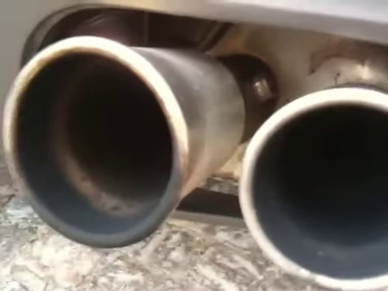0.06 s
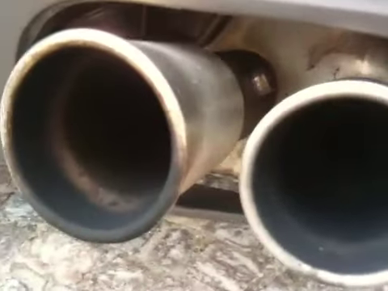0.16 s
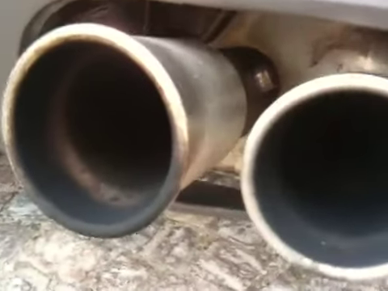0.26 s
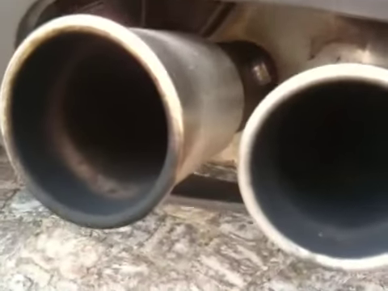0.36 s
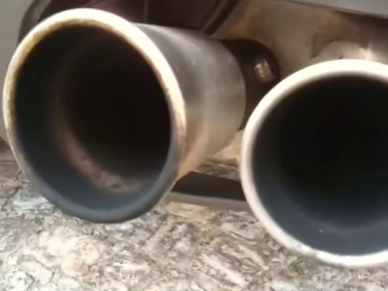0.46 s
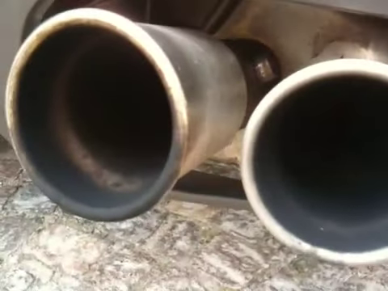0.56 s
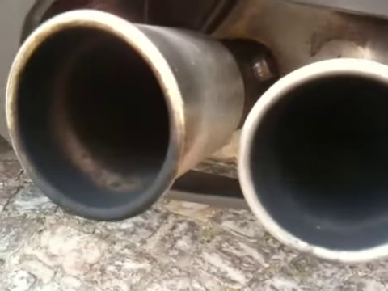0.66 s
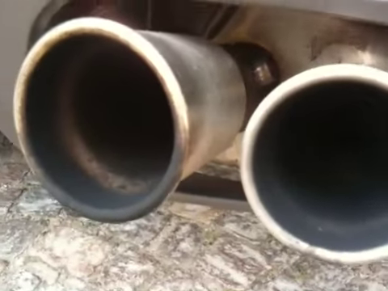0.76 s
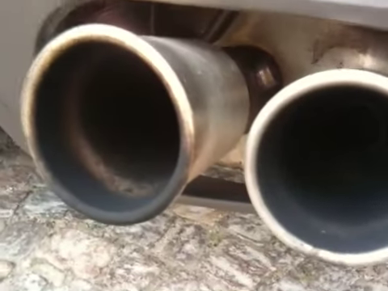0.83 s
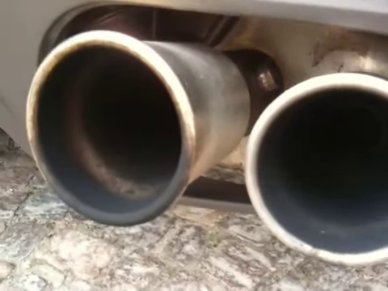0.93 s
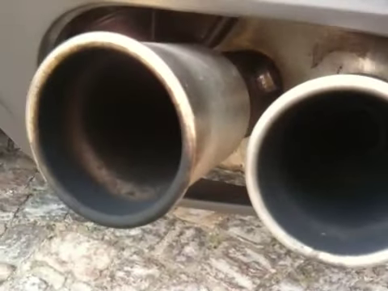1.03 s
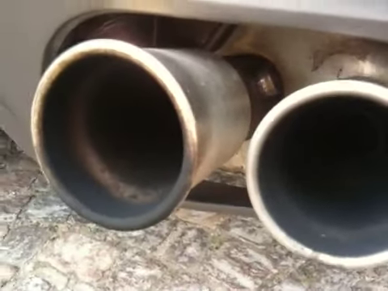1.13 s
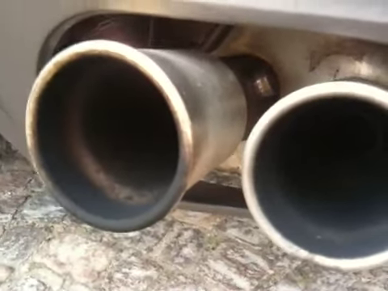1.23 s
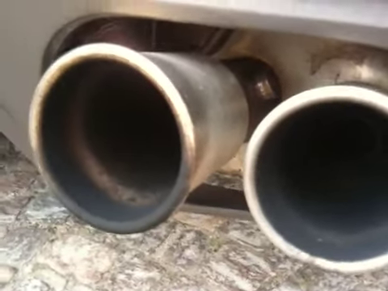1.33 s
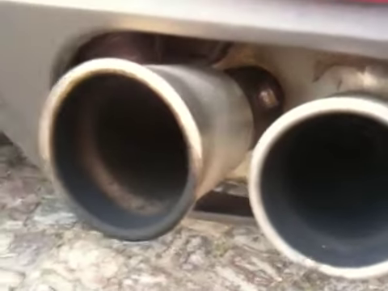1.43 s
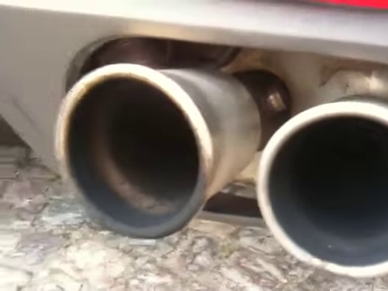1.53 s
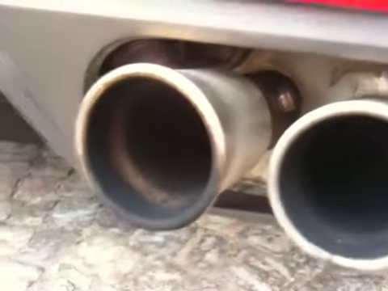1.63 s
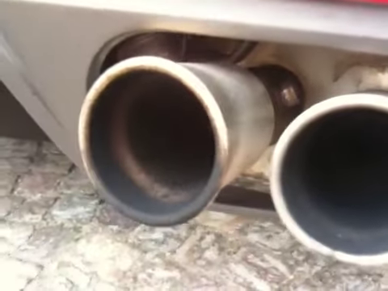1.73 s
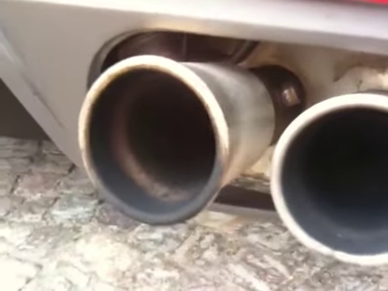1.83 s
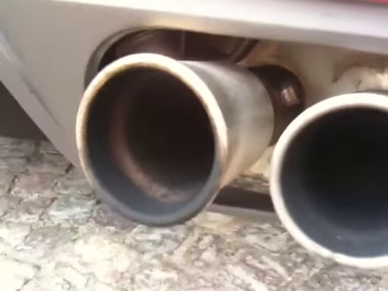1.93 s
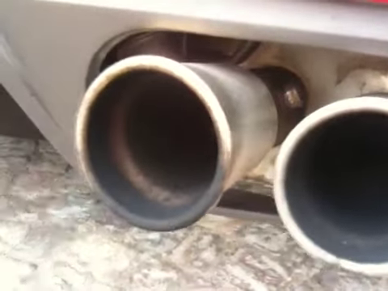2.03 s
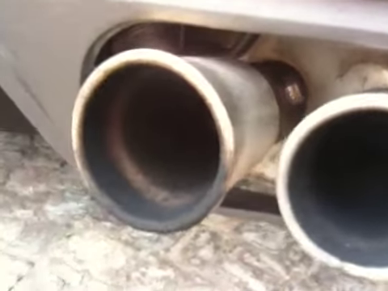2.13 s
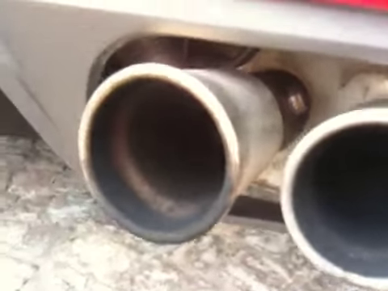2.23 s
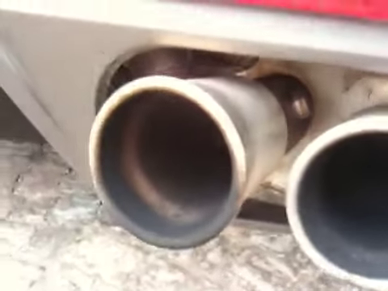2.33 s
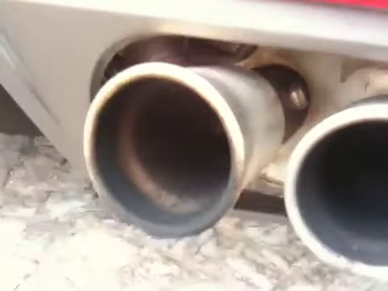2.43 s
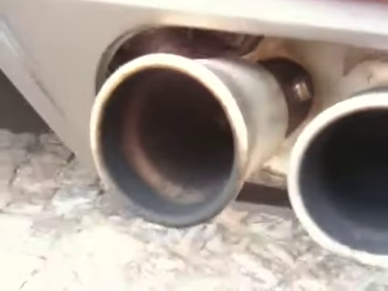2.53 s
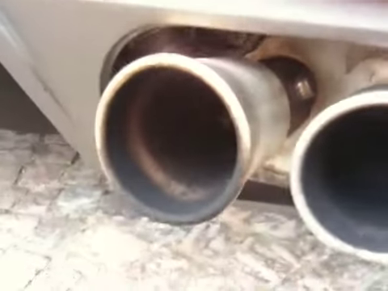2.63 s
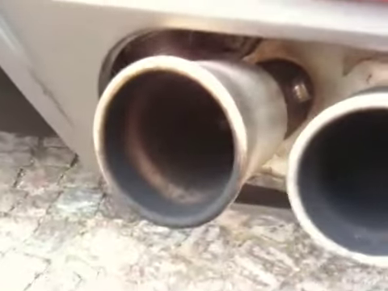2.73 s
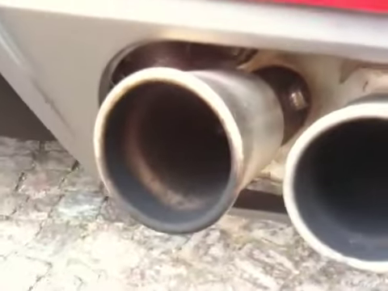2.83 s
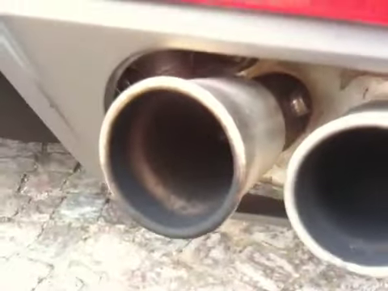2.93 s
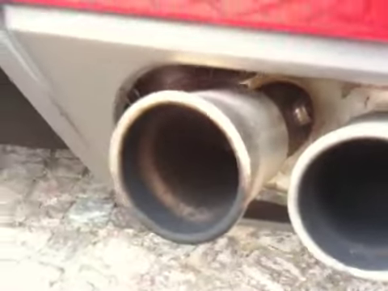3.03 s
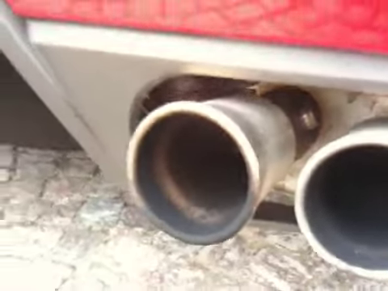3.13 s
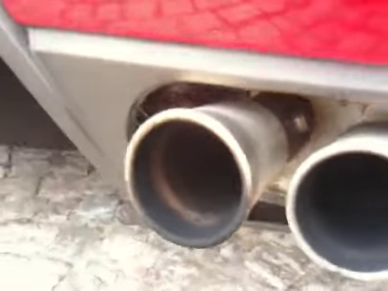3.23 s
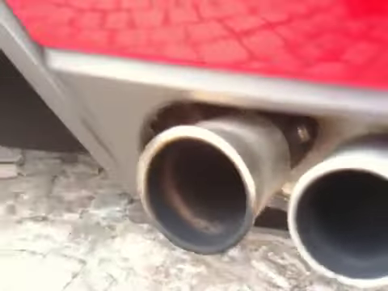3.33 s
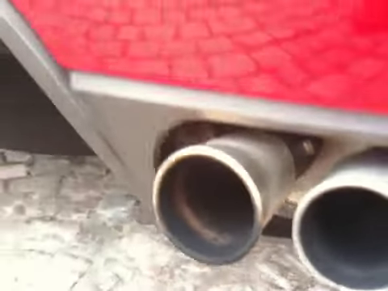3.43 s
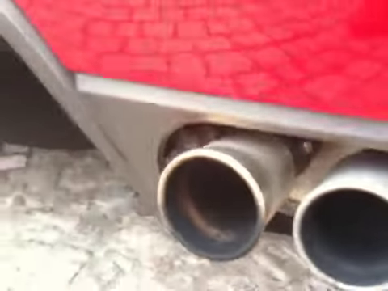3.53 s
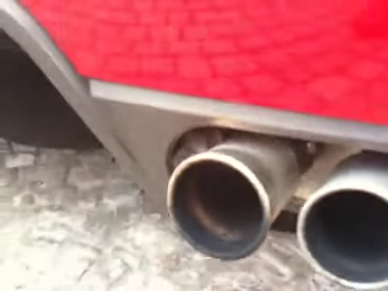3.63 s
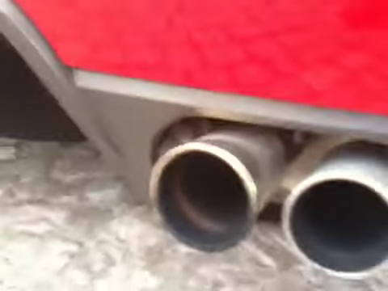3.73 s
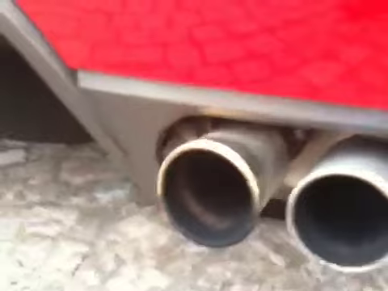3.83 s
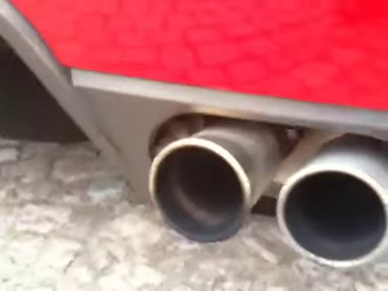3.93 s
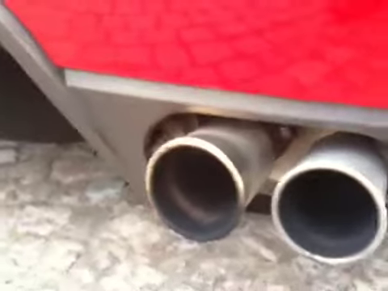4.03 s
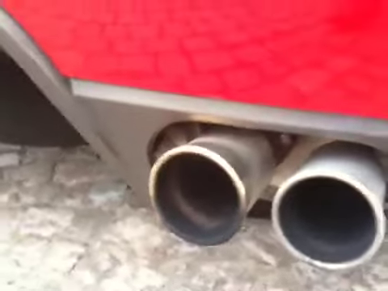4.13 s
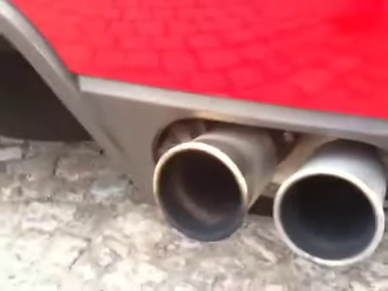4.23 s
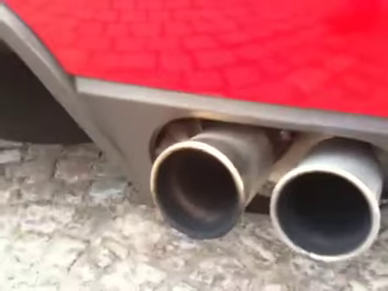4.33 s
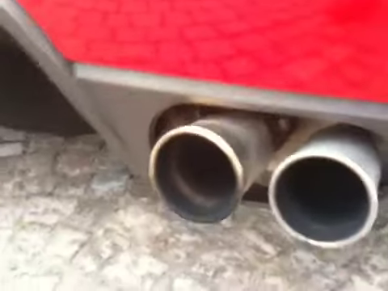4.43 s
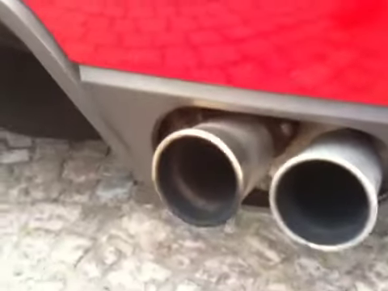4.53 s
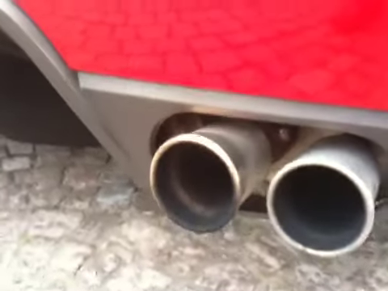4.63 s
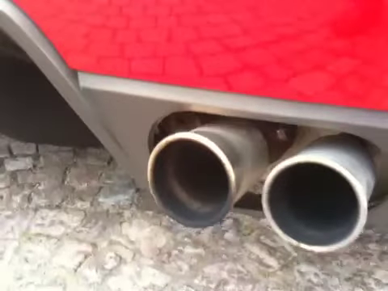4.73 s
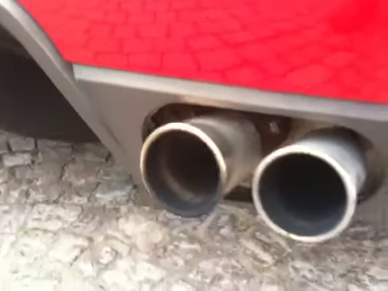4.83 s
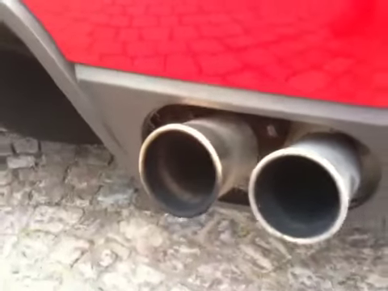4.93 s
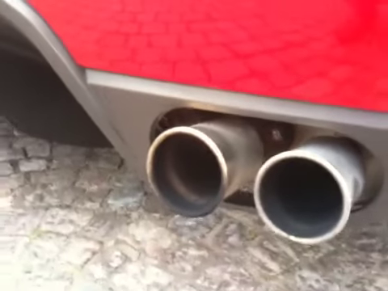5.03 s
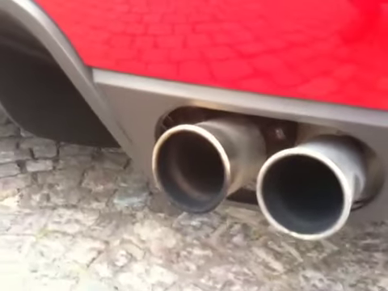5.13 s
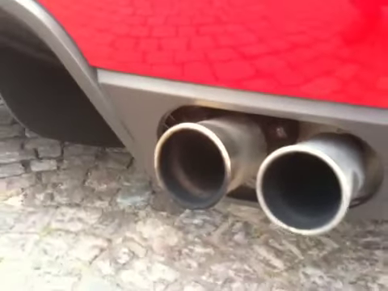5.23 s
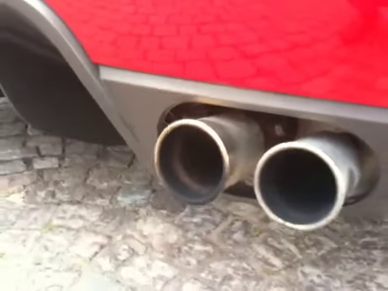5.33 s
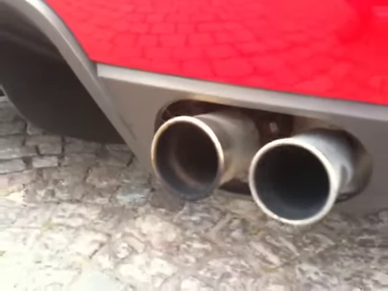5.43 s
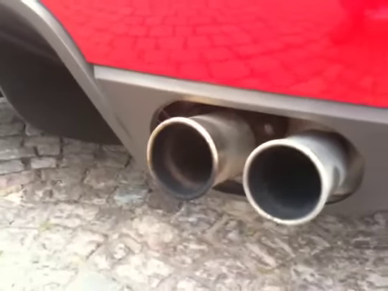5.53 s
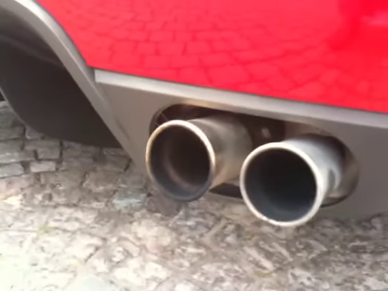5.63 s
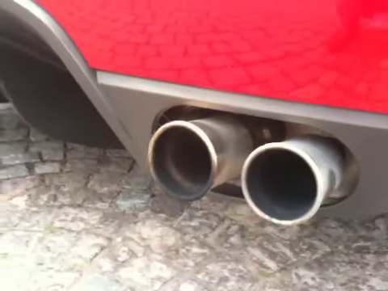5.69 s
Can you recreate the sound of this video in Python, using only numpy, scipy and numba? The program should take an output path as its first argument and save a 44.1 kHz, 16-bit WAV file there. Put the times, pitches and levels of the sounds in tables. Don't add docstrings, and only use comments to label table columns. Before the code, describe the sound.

A starter motor grinds and whines, then a big car engine barks alive, falters, roars up harshly close to the tailpipes and drops off.

```python
import sys
import numpy as np
from scipy import signal
from scipy.io import wavfile
from scipy.ndimage import uniform_filter1d
from numba import njit

SR = 44100
rng = np.random.default_rng(int(sys.argv[2]) if len(sys.argv) > 2 else 0)


def pcm_store(signal):
    levels = np.round(np.clip(np.atleast_2d(signal), -1, 1) * 32767)
    wavfile.write(sys.argv[1], SR, levels.astype(np.int16).T)


def voltage_ratio(decibels):
    exponent = np.asarray(decibels, float) / 20
    return 10 ** exponent


N = 254016

# pitch_hz [Hz], level_db [dB per Hz]
STREET_COLOUR = [(18, -76), (30, -46), (85, -17), (102, -15), (180, -7), (228, -3.5), (296, -9), (581, -10),
                 (735, -8.5), (815, -8), (1780, -16.5), (6200, -57), (15000, -47)]
# start_s [s], level_db [dB]
RUSTLES = [
    (.01, -74),
    (.184, -78),
    (.566, -58),
    (.658, -79),
]
STREET_DB, STREET_FADE_DB_S, STREET_FADE_S, STREET_FLICKER_DB = -46.5, 7, .85, 1.4
RUSTLE_DB, RUSTLE_DECAY_S = -71, 0.028

# time_s [s], mesh_hz [Hz], level_db [dB]
WHINE = [
    (1.19, 684, -52),
    (1.27, 789, -51),
    (1.325, 954, -42),
    (1.375, 832, -49.5),
    (1.42, 930, -41.5),
    (1.47, 937, -58),
    (1.51, 995, -43.5),
    (2.02, 949, -42.5),
    (2.06, 900, -53),
]
# multiple [of mesh_hz], level_db [dB]
WHINE_ORDERS = [(1, 1.5), (2, 4.5), (3, -1), (4, -5)]
# pitch_hz [Hz], level_db [dB per Hz]
GRIND_COLOUR = [(59, -34), (100, -5), (242, -16), (367, -11.5), (609, -3), (855, 1.5), (1250, -12.5),
                (1920, 9.5), (2500, -17), (2910, 0.5), (9000, -21), (11700, -45), (19800, -120)]
# pitch_hz [Hz], width_hz [Hz], level_db [dB]
HOUSING = [(232, 36, 1), (1110, 18, 6), (2980, 77, -18), (3100, 73, -5), (3860, 150, -6)]
# peak_s [s], pitch_hz [Hz], length_s [s], level_db [dB]
PINION_CHIRP = (1.18, 1140, .025, -34)
# start_s [s], peak_db [dB], pitch_hz [Hz]
PUFFS = [
    (0.948, -42, 114),
    (1.066, -39, 86.1),
    (1.275, -34, 105),
    (1.434, -40, 88.8),
    (1.575, -35, 101),
    (1.721, -37, 72),
    (1.868, -35, 106.3),
    (2.019, -41, 123.7),
]
ENGAGE_S, SLAM_RISE_S, SLAM_HOLD_S, STARTER_OFF_S = 0.899, 0.012, 0.037, 2.12
SLAM_DB, SLAM_SCRAPE_DB, SLAM_FALL_DB_S, SCRAPE_FALL_DB_S = -32, -40, 148, 320
GRIND_DB, SCRAPE_SLOW_DB, SCRAPE_FAST_DB = -37.5, -71, -55
SPIN_UP_S, LET_GO_S, LET_GO_DB = (1.14, 1.46), (1.976, 2.3), -19
BOUNCE_S, BOUNCE_WIDTH_S, BOUNCE_DB = .936, .007, 5.5

# start_s [s], ring_db, crack_db, thud_db [peak dB]
POPS = [(2.1, -32, -52, -18), (2.135, -34, -39, -9.5), (2.163, -13, -41, -6), (2.188, -29, -38, -3),
        (2.204, -13, -33, -7), (2.222, -3, -31.5, -27), (2.237, -8, -33, -1), (2.251, -5, -34, -21),
        (2.266, -8, -32, -6), (2.931, -15, -44, -29), (3.018, -12, -49, -28), (3.059, -2, -37, -9),
        (3.097, 0, -50, -3.5), (3.127, -24, -55, -6), (3.154, -8, -53, -13), (3.223, -2.5, -38, -3.5),
        (3.257, -1.5, -36, -46), (3.351, -6, -41, -6.5), (3.398, -14, -50, -10), (5.487, -1, -52, -10),
        (5.513, 3, -35.5, -14), (5.546, -2, -40, -22), (5.585, -10, -40, -28), (5.595, -0.5, -43, -22),
        (5.7, -8, -38, -20)]
# pitch_hz [Hz], width_hz [Hz], level_db [dB]
PIPE = [(78, 76, -8), (127, 58, -4), (263, 67.7, -3.5), (334, 89, -6), (476.4, 80, 1), (538.6, 52.8, 2),
        (650.6, 134, -5), (734, 121, -5), (930, 530, -15.5), (1121, 77, -10.5), (1500, 800, -28)]
CYLINDER_DB = [0.5, 4.5, -0.5, 8.5, -3.5, 8.5]
# [firings a second in one bank, Hz]
SPEED = [(2.17, 51.96), (2.31, 107.4), (2.39, 127.8), (2.52, 131.6), (2.7, 123.5), (2.87, 104.8),
         (3.09, 70.99), (3.27, 57.88), (3.4, 77.5), (3.52, 122.8), (3.7, 280.2), (3.78, 322), (3.87, 334),
         (4.2, 305.9), (4.42, 280.2), (4.51, 265.6), (4.62, 252), (5.76, 80.35)]
# [unevenness, dB]
LOAD = [(2.1, -23, -66, 2.5), (2.2, -9, -31, 5.5), (2.3, -4.5, -23, 2), (2.5, -3.5, -20, 1),
        (2.72, -4.5, -25, 3.5), (2.87, -4.5, -26.5, 2), (2.92, -9.5, -36, 3.5), (3.15, -16, -31.5, 2.5),
        (3.3, -15, -41, 2.5), (3.48, -5, -23, 3), (3.66, -2.5, -15, 2), (3.77, 1, -8, -0.5),
        (3.95, 0, -16.5, -1.5), (4.42, -5, -18.5, 2.5), (4.51, -23, -16.5, -5), (4.62, -5, -20, 5.5),
        (5.36, -3, -28.5, 3), (5.5, -12.5, -35.5, 4.5)]
# pitch_hz [Hz], level_db [dB per Hz]
GAS = [(410, -56), (700, -29.5), (919, -11.5), (1130, 4.5), (1220, -13.5), (1490, -12), (3880, -15),
       (12800, -34), (15600, -38)]
ORDERS = [6, 12, 18, 24, 36, 42, 3, 9, 15, 21, 27, 39, 4, 5, 7, 8, 10, 11, 13, 14, 16, 19, 33, 45]
ORDER_DB = [-3.5, 1.5, -2.5, -5, -8, -7, -1.5, 1.5, -1.5, -2.5, -10, -4.5, -13.5, -3, -12, -5.5, -24.5, -8,
            -3, -13.5, -4.5, -7.5, -5.5, -15.5]
# [strong-weak alternation, dB]
FIRING = [(2.15, -18.5, -29), (2.35, 0, -7.5), (2.55, 0, -8), (2.75, 2.5, -6), (2.9, -5.5, -16.5),
          (3.3, -15.5, -22), (3.5, 1, -6.5), (3.7, -5, -3.5), (3.82, -2.5, -25.5), (3.87, 1, -8.5),
          (4.05, -12.5, -5), (4.4, -6, -2.5), (4.5, -0.5, -13.5), (4.6, -6, -5), (4.85, -4, -2.5),
          (5.2, 1, -4), (5.42, -1.5, -12), (5.55, -5, -15.5)]
# pitch_hz [Hz], width_hz [Hz], level_db [dB]
EVEN_WAVES = [(128, 81, -11.5), (263.7, 74, -13.5), (326, 40.4, -7.5), (543.6, 101, -2), (387, 50, -20),
              (776, 355, -10.5)]
# pitch_hz [Hz], width_hz [Hz], level_db [dB]
BEAT_WAVES = [(163, 14, -9.5), (110, 30, -22.5), (254, 85, -19.5), (197, 50, -16.5), (462.6, 63, -0.5),
              (373, 93, -10.5), (593, 122, -4), (720, 83.3, -9), (876, 77, -20)]
# pitch_hz [Hz], width_hz [Hz], level_db [dB]
SHRIEK = [(1150, 157, 1.5), (1456, 93, -3)]
LUMP_SHARE, LUMP_PER_100_HZ = 0.67, 0.15
RUMBLE_DB, RUMBLE_PER_FLOW = -15.5, 0.45
RUMBLE_PER_PULSE, RUMBLE_PER_100_HZ = 0.28, -2.5
SHRIEK_PER_FLOW, FULL_FLOW_DB, SHRIEK_FLOOR_DB = 4.1, -10.5, -17
WAVER, WAVER_PER_SCATTER_DB = .012, .008
DULL_PER_FLOW = 0.36
MINOR_PER_SCATTER, MINOR_TILT_DB = -1.48, -4.5
FLUTTER_DB, FLUTTER_PER_SCATTER = 1.2, .25
OPEN_PIPE_DB = -26


@njit
def svf(x, hz, width):
    y, band, low = np.empty(len(x)), 0., 0.
    g, k = np.tan(np.pi * hz / SR), width / hz
    for i in range(len(x)):
        v = (band + g * (x[i] - low)) / (1 + g * (g + k))
        band, low, y[i] = 2 * v - band, low + 2 * g * v, k * v
    return y


def level(x, db=0):
    return x * voltage_ratio(db) / np.sqrt(np.mean(x ** 2))


def butter(x, order, hz, kind="low"):
    return signal.sosfilt(signal.butter(order, hz, kind, fs=SR, output="sos"), x)


def curves(table):
    times, *columns = np.transpose(table)
    t = np.arange(N) / SR
    return t, (t > times[0]) * 1., [np.interp(t, times, column) for column in columns]


def walk(rate):
    hold = int(SR / rate)
    steps = np.repeat(rng.standard_normal(N // hold + 1), hold)
    return 1.43 * uniform_filter1d(uniform_filter1d(steps, hold), hold)[:N]


def coloured(colour, flicker_db, rate):
    hz, db = np.transpose(colour)
    out = 0
    for centre in hz[0] * 2 ** np.arange(.25, np.log2(hz[-1] / hz[0]), .5):
        band = svf(svf(rng.standard_normal(N), centre, centre / 2), centre, centre / 2)
        band_db = np.interp(np.log(centre), np.log(hz), db)
        out = out + voltage_ratio(band_db + flicker_db * walk(rate)) * band
    return level(out)


def ring(x, modes):
    return sum((-1) ** k * voltage_ratio(db) * svf(x, 1. * hz, 1. * width) for k, (hz, width, db) in enumerate(modes))


def street():
    t = np.arange(N) / SR
    wash_db = STREET_DB - STREET_FADE_DB_S * np.minimum(t, STREET_FADE_S)
    wash = coloured(STREET_COLOUR, STREET_FLICKER_DB, 26.4) * voltage_ratio(wash_db)
    age = np.clip(t - .114, 0, 1)
    stone = voltage_ratio(-33) * np.exp(-age / .006) * np.sin(2 * np.pi * 950 * age)
    stir = voltage_ratio(RUSTLE_DB)
    for start_s, db in RUSTLES:
        stir = stir + voltage_ratio(db) * (t > start_s) * np.exp(-np.abs(t - start_s) / RUSTLE_DECAY_S)
    rustle = level(svf(rng.standard_normal(N), 4100.0, 2500.)) * stir * voltage_ratio(-1.0 + 1.6 * walk(148.6))
    return wash + rustle + stone


def puffs():
    t, out = np.arange(N) / SR, 0
    for start_s, db, hz in PUFFS:
        age = np.clip(t - start_s, 0, 1)
        out = out + voltage_ratio(db + 11) * (age / 0.015) * np.exp(-age / 0.006) * np.sin(2 * np.pi * hz * age)
    return out


def grinding(throb):
    t = np.arange(N) / SR
    on = np.clip((t - ENGAGE_S) / SLAM_RISE_S, 0, 1) ** 2 * (t < STARTER_OFF_S)
    on = on * voltage_ratio(np.interp(t, LET_GO_S, [0, LET_GO_DB]))
    after = np.maximum(t - ENGAGE_S - SLAM_RISE_S - SLAM_HOLD_S, 0)
    grind_db = np.maximum(SLAM_DB - SLAM_FALL_DB_S * after, GRIND_DB)
    grind_db = grind_db + BOUNCE_DB * np.exp(-((t - BOUNCE_S) / BOUNCE_WIDTH_S) ** 2)
    running_db = np.interp(t, SPIN_UP_S, [SCRAPE_SLOW_DB, SCRAPE_FAST_DB])
    scrape_db = np.maximum(SLAM_SCRAPE_DB - SCRAPE_FALL_DB_S * after, running_db)
    grind = coloured(GRIND_COLOUR, 0.88, 18) + level(ring(rng.standard_normal(N), HOUSING), -7.5)
    scrape = level(svf(rng.standard_normal(N), 6000.0, 5600.0)) * voltage_ratio(scrape_db + 1.3 * walk(230))
    return on * (grind * voltage_ratio(grind_db - 5.0 + 4.1 * throb) + scrape)


def gear_whine(turn, throb):
    t, on, (hz, whine_db) = curves(WHINE)
    on = on * (t < WHINE[-1][0])
    phase = np.cumsum(hz * (1 + .17 * throb + .012 * walk(140))) / SR
    whine = sum(voltage_ratio(db + 3.5 * walk(130)) * np.sin(2 * np.pi * k * phase) for k, db in WHINE_ORDERS)
    whine *= on * voltage_ratio(whine_db + 2 * throb + 2 * np.sin(2 * np.pi * turn))
    paths = rng.standard_normal(3000) * np.exp(-np.arange(3000) / (0.025 * SR))
    smeared = signal.fftconvolve(whine, paths / np.linalg.norm(paths))[:N]
    hum_hz = .272 * hz * (1 + 0.0308 * np.sin(2 * np.pi * (turn - .3)))
    hum_db = -50.5 + 3.0 * np.sin(2 * np.pi * (turn - .15)) + 1.5 * walk(29.4)
    hum = on * voltage_ratio(hum_db) * np.sin(2 * np.pi * np.cumsum(hum_hz) / SR)
    return 0.53 * whine + 0.67 * smeared + hum


def starter():
    t = np.arange(N) / SR
    times = np.array(PUFFS)[:, 0]
    turn = np.interp(t - .05, times, np.arange(len(times)))
    stroke = 2 * turn % 1
    throb = uniform_filter1d(.5 - stroke, size=400) * np.clip((t - 1.44) / .05, 0, 1)
    peak_s, hz, length_s, db = PINION_CHIRP
    chirp = voltage_ratio(db) * np.exp(-((t - peak_s) / length_s) ** 2) * np.sin(2 * np.pi * hz * t)
    return gear_whine(turn, throb) + chirp + grinding(throb) + puffs()


def pops():
    start_s, ring_db, crack_db, thud_db = np.transpose(POPS)
    blows = np.zeros((3, N))
    blows[:, (start_s * SR).astype(int)] = voltage_ratio(np.array([ring_db + 33.5, thud_db + 44, crack_db + 10]))
    rounded = butter(blows[:2], 2, 2200)
    air = svf(svf(rng.standard_normal(N), 2800.0, 2400.0), 3000.0, 2900.0)
    crack = signal.lfilter([1], [1, -np.exp(-1 / (0.0014 * SR))], blows[2]) * level(air)
    return ring(rounded[0], PIPE[3:]) + ring(rounded[1], PIPE[:3]) + crack


def firing_pulses(phase, hz, pulse_db, scatter_db):
    t = np.arange(N) / SR
    count = np.arange(int(phase[-1]))
    chance = np.clip(rng.standard_normal((N // 100, 2))[:len(count)].T, -1.5, 1.5)
    at = np.interp(count + 0.0086, phase, np.arange(N))
    i = at.astype(int)
    at = np.clip(at + 0.022 * scatter_db[i] * chance[0] * SR / hz[i], 0, N - 2)
    lump = LUMP_SHARE + LUMP_PER_100_HZ * (hz[i] - 150) / 100
    size = voltage_ratio(np.take(CYLINDER_DB, count % 6) + scatter_db[i] * chance[1])
    size *= 1 + np.clip(lump, 0, 1) * (-1) ** count
    size *= voltage_ratio(pulse_db[i]) * np.sqrt(SR / hz[i])
    size *= np.interp(t[i], [2.1, 2.24, 2.3], [.25, .4, 1])
    pulses = np.zeros(N)
    np.add.at(pulses, at.astype(int), size * (1 - at % 1))
    np.add.at(pulses, at.astype(int) + 1, size * (at % 1))
    return pulses


def pipe_note(pulses, gust, on, hz, pulse_db, gas_db):
    rumble_db = RUMBLE_DB + RUMBLE_PER_FLOW * (gas_db + 27) + RUMBLE_PER_PULSE * (pulse_db + 9)
    rumble_db = rumble_db + RUMBLE_PER_100_HZ * (hz - 150) / 100
    rumble = on * (1 + 0.18 * gust) * rng.standard_normal(N) * voltage_ratio(rumble_db + 11.5)
    drive = voltage_ratio(14) * butter(pulses, 3, 1400) + rumble
    note = ring(drive, PIPE[3:8]) + ring(drive, PIPE[:3]) * (110 / hz) ** 1.28
    return note - ring(drive, PIPE[8:]) * voltage_ratio(0.58 * (gas_db + 28.5))


def gas_roar(gust, gas_db):
    gas = coloured(GAS, 1.13, 25.02)
    dull = butter(gas, 2, 3500)
    roar = gust * voltage_ratio(gas_db - 4.5) * (dull + (gas - dull) * voltage_ratio(0.36 * (gas_db + 9.5)))
    hiss = gust * voltage_ratio(2.1 * gas_db - 4) * butter(rng.standard_normal(N), 2, 9000, "high")
    return roar + hiss


def standing(pitch, waves):
    return sum(voltage_ratio(db) / (1 + (2 * (pitch - peak_hz) / width) ** 4) for peak_hz, width, db in waves)


def singing(note, phase, hz, gas_db, scatter_db):
    out, span = note.copy(), phase > 0
    even, beat = (voltage_ratio(db[span]) for db in curves(FIRING)[2])
    cycle, hz, gas_db, scatter_db = phase[span] / 6, hz[span], gas_db[span], scatter_db[span]
    drift, offset = walk(25)[span], rng.random(64)
    fast = (hz / 330) ** 4
    opened = voltage_ratio(SHRIEK_PER_FLOW * np.minimum(gas_db - FULL_FLOW_DB, 0)) + voltage_ratio(SHRIEK_FLOOR_DB) * fast
    weak = DULL_PER_FLOW * np.minimum(gas_db + 21, 0)
    wander = drift * (WAVER + WAVER_PER_SCATTER_DB * scatter_db)
    for order, order_db in zip(ORDERS, ORDER_DB):
        pitch = order * hz / 6
        if order % 6:
            gain = beat * standing(pitch, BEAT_WAVES) + opened * standing(pitch, SHRIEK)
        else:
            gain = even * standing(pitch, EVEN_WAVES)
        gain = gain + voltage_ratio(OPEN_PIPE_DB) * fast * beat
        gain = gain * voltage_ratio(order_db + weak * np.log2(pitch / 130))
        if order % 3:
            tilt_db = MINOR_TILT_DB * np.log2(np.maximum(pitch / 300, 1))
            gain = gain * voltage_ratio(MINOR_PER_SCATTER * scatter_db + 2.71 * walk(6)[span] + tilt_db)
        spin = np.exp(2j * np.pi * order * cycle)
        slow = note[span] / spin
        slow = uniform_filter1d(slow.real, size=1800) + 1j * uniform_filter1d(slow.imag, size=1800)
        rough = 2 * np.real(spin * slow)
        share = np.clip(gain / voltage_ratio(-23), 0, 1)
        tone = np.cos(2 * np.pi * (order * cycle + offset[order]) + order * wander)
        flutter = voltage_ratio((FLUTTER_DB + FLUTTER_PER_SCATTER * scatter_db) * walk(35)[span])
        out[span] += gain * flutter * tone - share * rough
    return out


def engine():
    t, _, (hz,) = curves(SPEED)
    _, on, (pulse_db, gas_db, scatter_db) = curves(LOAD)
    phase = np.cumsum(hz * on) / SR
    pulses = firing_pulses(phase, hz, pulse_db, scatter_db)
    burst = signal.lfilter([1], [1, -np.exp(-1 / (.0035 * SR))], (pulses / voltage_ratio(pulse_db)) ** .9)
    gust = (.8 + level(burst)) * on
    note = pipe_note(pulses, gust, on, hz, pulse_db, gas_db)
    return singing(note, phase, hz, gas_db, scatter_db) + gas_roar(gust, gas_db)


def scene():
    fade = np.minimum(np.arange(N)[::-1] / 150, 1)
    return np.tile((street() + starter() + pops() + engine()) * fade, (2, 1))


def low_pass(x):
    return signal.sosfilt(signal.butter(12, 15710, fs=SR, output="sos"), x)


def record(dry):
    thin = butter(dry, 3, 85, "high")
    top, knee = .7, 6.5
    clipped = thin / (1 + np.abs(thin / top) ** knee) ** (1 / knee)
    tilted = butter(clipped, 2, 45, "high")
    return low_pass(tilted)


dry = scene()
out = record(dry)
pcm_store(out)
```